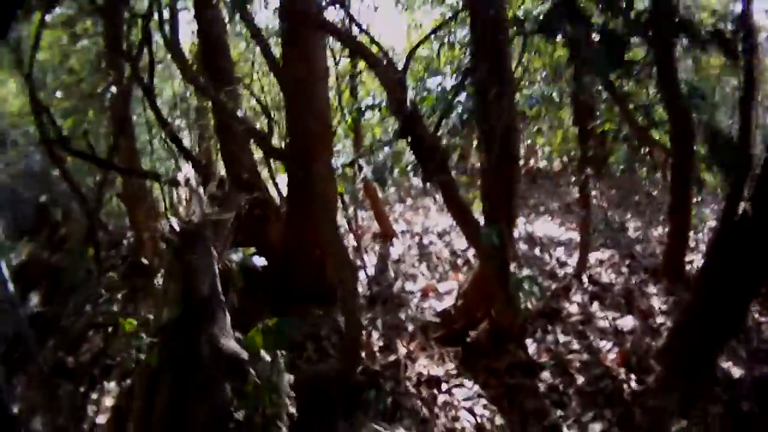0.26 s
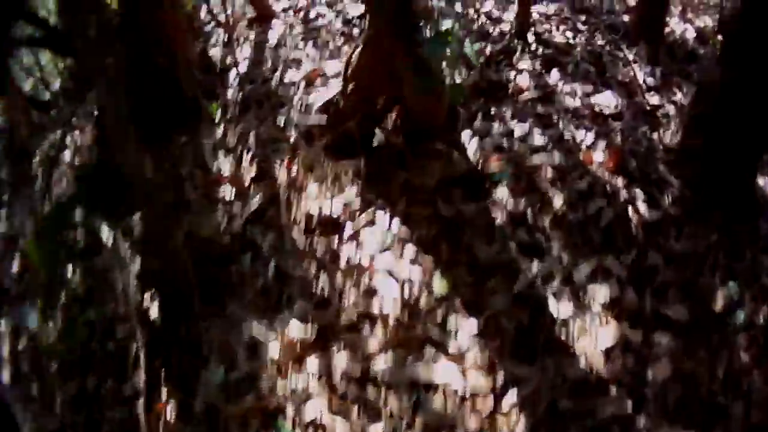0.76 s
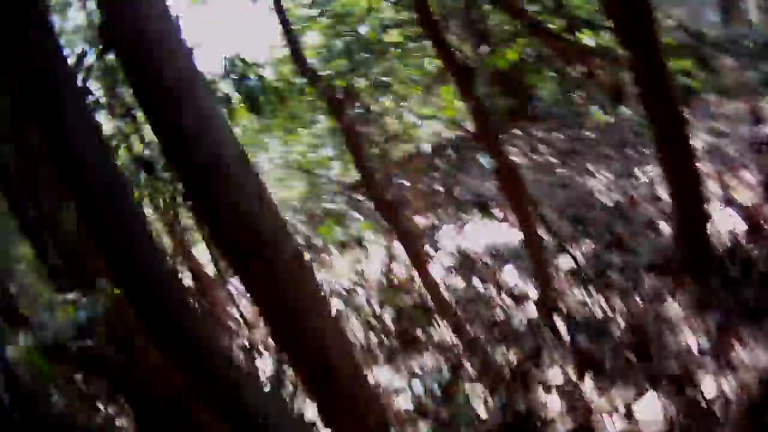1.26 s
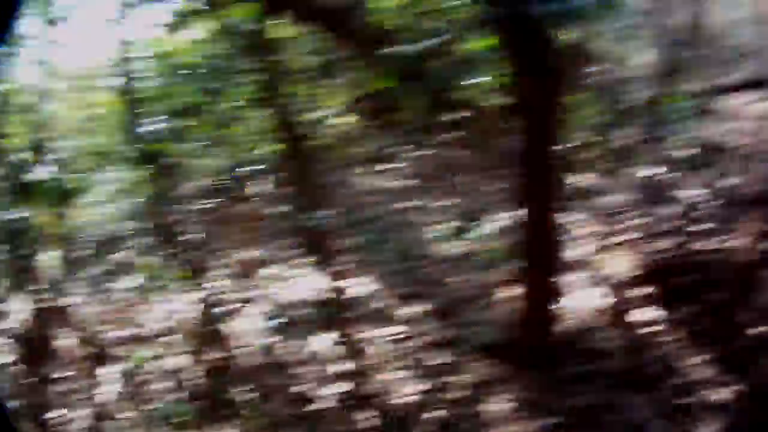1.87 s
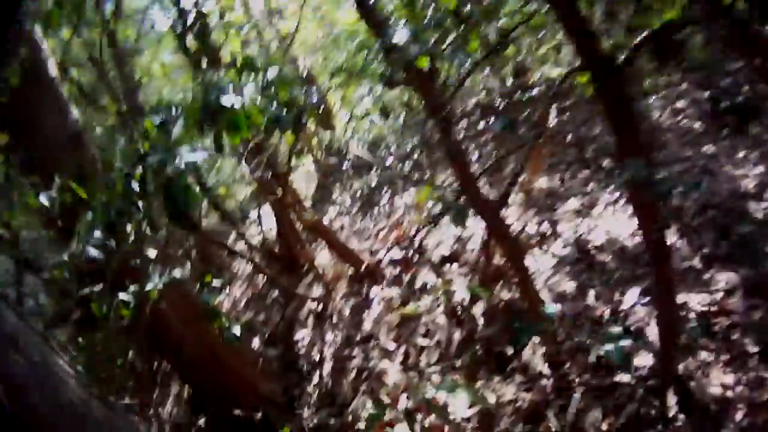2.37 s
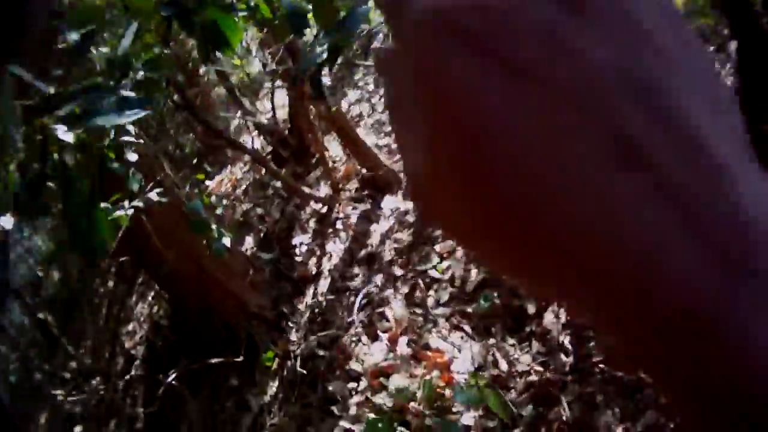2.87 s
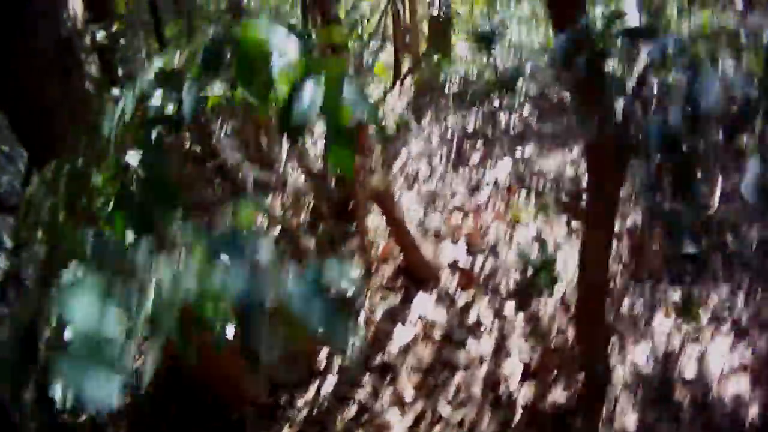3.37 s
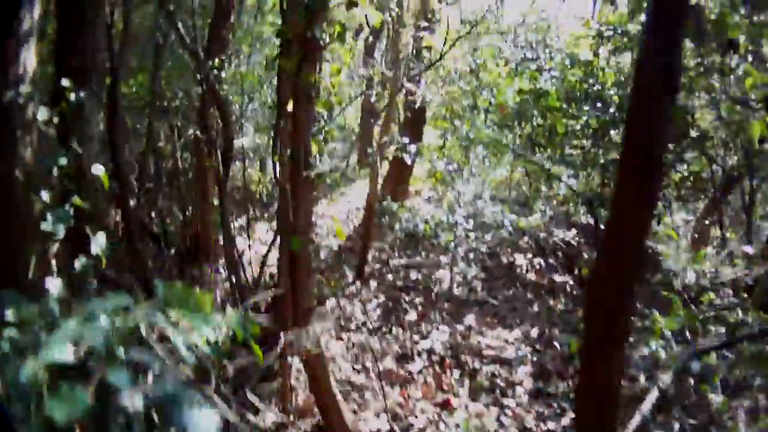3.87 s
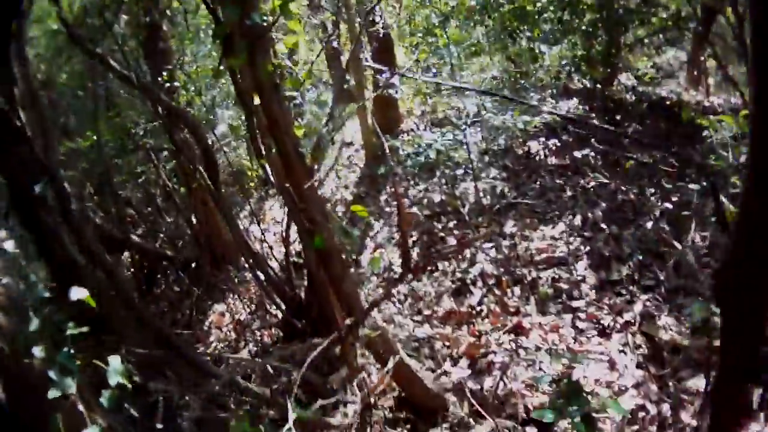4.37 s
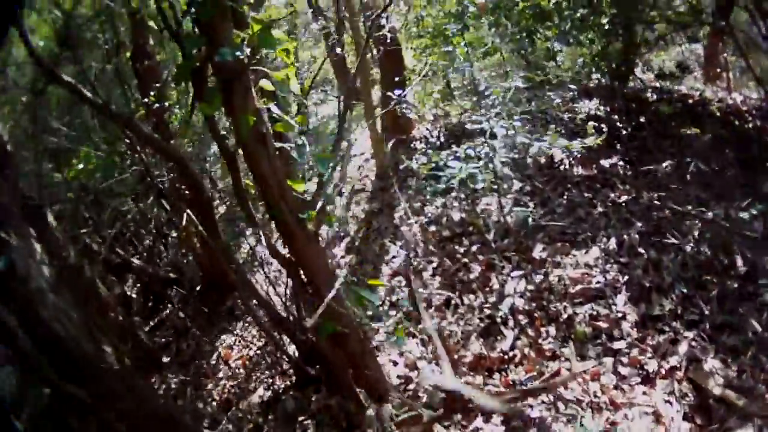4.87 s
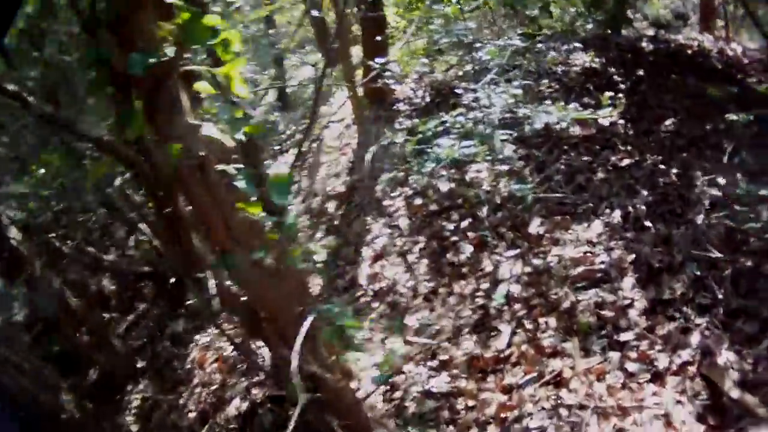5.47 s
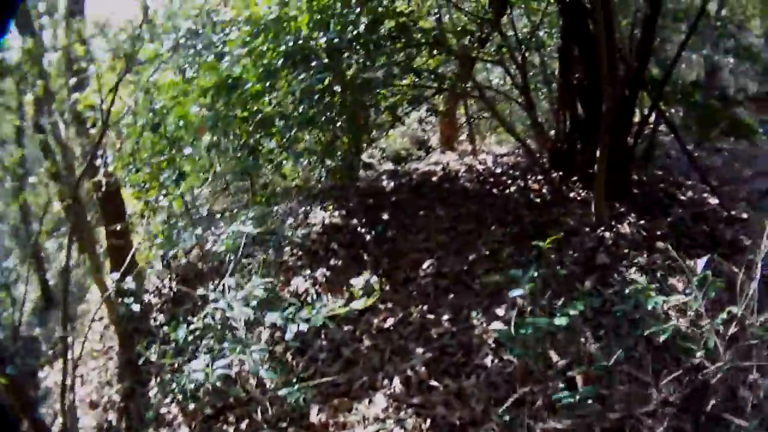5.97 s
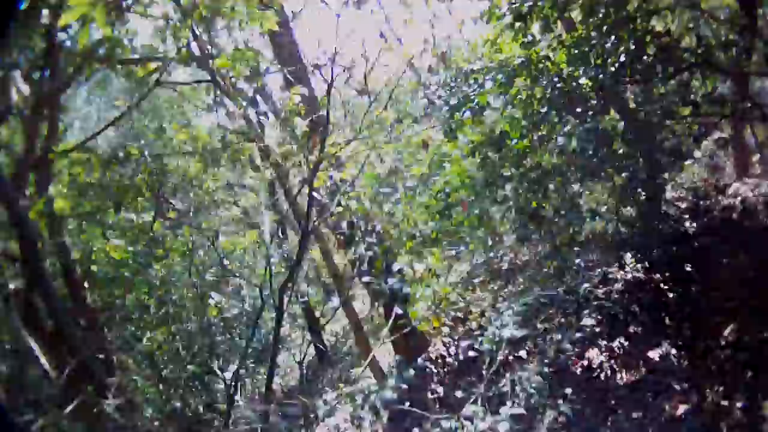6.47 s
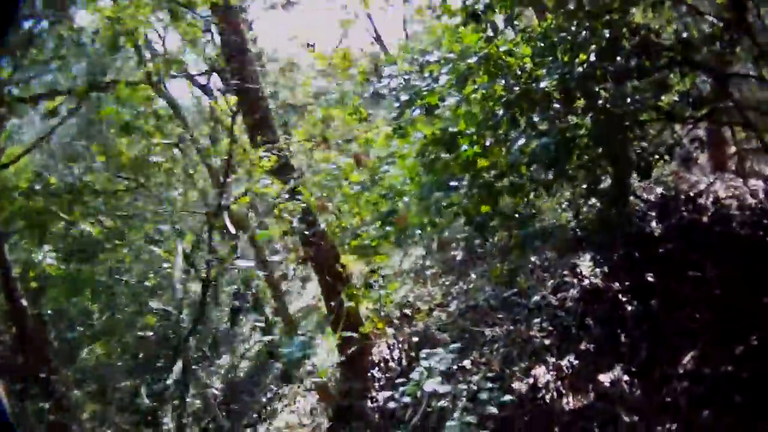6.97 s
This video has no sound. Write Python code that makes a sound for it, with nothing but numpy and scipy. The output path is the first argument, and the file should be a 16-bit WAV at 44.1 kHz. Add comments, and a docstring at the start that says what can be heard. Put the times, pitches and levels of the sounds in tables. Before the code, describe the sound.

Close, irregular footsteps crush dry leaves on a forest floor, with ticking twigs and soft knocks from buried sticks. A pushed branch hits the handheld microphone with a sharp knock and a quick rasp. The walker brushes on through the litter, and two twigs break loudly about two seconds apart. Loose leaves keep stirring between the steps, over a very faint hiss of woodland air.

```python
"""Walking through dry leaves

Someone walks unevenly through fallen leaves in a quiet wood, camera in hand. Each step crushes
them into a dense crackle; twigs snap, buried sticks knock, heavy feet thud and the trunks scatter
the sound. A branch that is pushed aside knocks on the camera and scrapes along it."""
import sys
import numpy as np
from scipy import signal
from scipy.fft import rfft, irfft
from scipy.io import wavfile
from scipy.ndimage import uniform_filter1d, minimum_filter1d

SR = 44100
rng = np.random.default_rng(int(sys.argv[2]) if len(sys.argv) > 2 else 0)


def generate_wav(sig):
    """Save sig (samples, or channels by samples) to the path in sys.argv[1] as 16-bit PCM at SR."""
    pcm = np.round(np.clip(np.atleast_2d(sig).T, -1, 1) * 32767).astype(np.int16)
    wavfile.write(sys.argv[1], SR, pcm)


N = 318679
TIME = np.arange(N) / SR
FREQ = np.fft.rfftfreq(N, 1 / SR) + 1


def undb(db):
    """Decibels to gain."""
    return 10 ** (np.asarray(db) / 20)


def unit(x):
    """Scale to rms 1."""
    return x / np.sqrt(np.mean(x ** 2))


def colour(x, points):
    """EQ through (Hz, dB) points; minimum phase, so clicks keep their sharp attacks."""
    hz, db = np.transpose(points)
    grid = np.fft.rfftfreq(2048, 1 / SR) + 1
    gain = undb(np.interp(np.log(grid), np.log(hz), db))
    cepstrum = irfft(np.log(gain))
    half = len(cepstrum) // 2
    cepstrum[1:half] *= 2
    cepstrum[half + 1:] = 0
    impulse = irfft(np.exp(rfft(cepstrum)))
    return signal.fftconvolve(x, impulse)[:len(x)]


def band(x, hz, q):
    """One resonance, gain 1 at its centre."""
    w = 2 * np.pi * min(hz, .45 * SR) / SR
    a = np.sin(w) / (2 * q)
    return signal.lfilter([a, 0, -a], [1 + a, -2 * np.cos(w), 1 - a], x)


def burst(t60):
    """A noise hit with an instant attack, a fading tail and an evened-out spectrum."""
    fade = np.exp(-np.log(1000) * TIME[:SR // 4] / t60)
    spectrum = rfft(rng.standard_normal(len(fade)) * fade)
    even = irfft(spectrum / np.abs(spectrum) ** .7, len(fade))
    return even * np.sqrt(fade * np.sum(fade ** 2) / np.sum(even ** 2))


def drift(per_s):
    """A random modulator that glides between values with a spread of 1."""
    points = rng.standard_normal(4096)
    return np.interp(TIME * per_s, np.arange(len(points)), points)


def add(out, s, x):
    """Mix a short sound in at s seconds."""
    i = max(int(s * SR), 0)
    out[i:i + len(x)] += x[:max(N - i, 0)]


# The tone of the quiet wood. Each row: frequency in Hz, gain in dB.
AIR_EQ = [(30, -8), (100, -13), (250, -7.5), (420, -1.5), (750, -15.5), (1300, -5.5), (3000, -4.5),
          (8000, -10), (15000, -13.5)]


def air():
    """A faint bed of noise whose level wavers."""
    return undb(-54.5 + 3.85 * drift(7.8)) * unit(colour(rng.standard_normal(N), AIR_EQ))


# Loose leaves stirring between steps. Each row: time in seconds, relative level in dB.
STIR_LEVELS = [(0, -60.5), (.38, -52), (.88, -56), (1.45, -51.5), (1.95, -55), (2.45, -48.5), (2.78, -52),
               (2.93, -59), (3.2, -48), (5.4, -47), (6.6, -46.5), (7.23, -48)]


def stirring():
    """A restless rustle that comes and goes: one move of (envelope, body dB, crispness dB)."""
    level_db = np.interp(TIME, *np.transpose(STIR_LEVELS))
    return [(undb(level_db + 1.29 * drift(14)), 3, 1)]


def fractures(per_s, spread_db, t60, q, bands):
    """Leaves of many pitches break at random, each with a tick of noise; most are tiny, a few large."""
    out = 0
    fade = np.exp(-2 * np.log(1000) / (t60 * SR))
    for hz in np.geomspace(500, 14000, bands):
        breaks = np.flatnonzero(rng.random(N) < per_s / bands / SR)
        energy = np.zeros(N)
        energy[breaks] = undb(spread_db * np.minimum(rng.exponential(size=len(breaks)), 3.5)) ** 2
        ticks = np.sqrt(signal.lfilter([1], [1, -fade], energy + 1e-12))
        out = out + ticks * band(rng.standard_normal(N), hz, q)
    return unit(out / np.sqrt(per_s))


# The tone of crushed leaves. Each row: frequency in Hz, gain in dB.
LEAF_EQ = [(47, -50), (80, -14), (205, -12.5), (482, -5.5), (684, -14), (1320, -5.5), (1640, -3.5),
           (2550, 2), (4210, -2), (4700, 1), (5850, -2.5), (7440, -0.5), (8870, -2.5), (13200, -4),
           (15000, -9.5)]


def leaves(moves):
    """A harder push breaks more leaves; loose ones crackle on top, single stalks tick between steps."""
    envelopes, body_db, crisp_db = map(np.array, zip(*moves))
    power = envelopes ** 2
    push = np.sqrt(np.sqrt(power.sum(axis=0)) / undb(-40.5))
    crush = fractures(5500 * push, spread_db=1.5, t60=0.0053, q=0.19, bands=4)
    crackle = fractures(650 * push, spread_db=4.5, t60=0.014, q=3.2, bands=18)
    stalks = fractures(30, spread_db=3.0, t60=0.013, q=1.8, bands=8) / np.maximum(push, 1)
    crunch = crush * undb(1.62 * drift(70)) + undb(-4.5) * crackle + undb(-8.5) * stalks
    spectrum = rfft(unit(colour(crunch, LEAF_EQ)))
    # The moves ride three faders: the body of the packed litter, the mids and the crisp top.
    low = 1 / (1 + (FREQ / 1200) ** 4)
    high = 1 / (1 + (5500 / FREQ) ** 4)
    registers = [(low, 3.2 + body_db), (1 - low - high, 0.13 - crisp_db / 2), (high, 2.5 + crisp_db / 2)]
    out = np.zeros(N)
    for share, db in registers:
        fader = np.sqrt(undb(db) ** 2 @ power)
        out += irfft(spectrum * share, N) * fader
    return out


def trunks(x, t60, scatter_db):
    """Ground and trunks add a short, thin scatter to the direct sound."""
    onset = 1 - np.exp(-TIME[:SR // 4] / 0.00037)
    echo = band(burst(t60) * onset, 3900, q=0.057)
    return x + undb(scatter_db) * signal.fftconvolve(x, echo / np.linalg.norm(echo))[:N]


# Twigs and stalks breaking; the row at 1.153 s is the sharp crack of a heel landing. Each row: start in
# seconds, # level in dB, centre in Hz, time scale of the decay in seconds.
TWIG_SNAPS = [(.066, -41.5, 7100, .007), (.355, -36.5, 7000, 0.0092), (.597, -29.5, 3980, 0.021),
              (.629, -30, 6800, 0.027), (.730, -31.5, 5700, 0.025), (.9276, -17.5, 6040, 0.0094),
              (.929, -33.5, 1410, 0.01), (.976, -26, 2740, 0.008), (1.007, -27, 6700, 0.011),
              (1.095, -33, 5000, .013), (1.153, -41, 8000, 0.023), (1.3741, -28, 4230, 0.016),
              (1.663, -38, 7000, 0.0096), (1.752, -47, 1190, 0.029), (1.858, -35.5, 6030, .008),
              (1.996, -40, 1480, 0.041), (2.130, -32, 5030, 0.011), (2.3278, -31.5, 1680, 0.026),
              (2.328, -32, 10500, 0.0083), (2.454, -37.5, 2800, 0.021), (2.5543, -25, 5500, 0.002),
              (3.633, -29, 8760, 0.008), (3.743, -27.5, 8870, 0.017), (3.8318, -7, 11200, 0.0099),
              (3.853, -18.5, 8000, 0.029), (3.883, -20.5, 10260, 0.0079), (3.9882, -21.5, 7640, .006),
              (4.044, -27.5, 7160, 0.015), (4.1505, -29, 10100, .006), (4.296, -32, 4505, 0.0072),
              (4.452, -40, 1180, 0.032), (4.549, -25, 4950, .023), (4.6823, -21, 1377, 0.017),
              (4.712, -29, 12140, 0.0098), (4.806, -31.5, 3530, .034), (5.276, -35, 4000, .007),
              (5.288, -24, 4690, 0.019), (5.528, -24.5, 4800, 0.0095), (5.633, -4.5, 4120, 0.014),
              (5.6332, -8.5, 9350, 0.0075), (5.906, -19, 6430, 0.0056), (5.922, -27.5, 6200, 0.0093),
              (6.33, -32, 6100, .01), (6.364, -26, 4500, 0.0061), (6.407, -25.5, 1380, 0.0062),
              (6.655, -33, 3850, 0.0086), (6.847, -33.5, 4700, 0.016), (6.9285, -32.5, 8200, 0.0071),
              (7.2044, -32, 3870, 0.021)]


def twigs():
    """Fibres tear and part; the twig rings broadly, with a narrow ping and two stray modes."""
    out, t = np.zeros(N), TIME[:SR // 4]
    for s, db, hz, decay_s in TWIG_SNAPS:
        tear = burst(2.0 * decay_s) * (np.exp(-(t / (0.36 * decay_s)) ** 2) + 0.21)
        ping = 1.22 * band(tear, hz, q=9)
        strays = 0.95 * sum(band(tear, hz * 2 ** octave, q=3.9) for octave in rng.uniform(-1.21, 0.88, 2))
        ring = band(tear, hz, q=1.0) + 1.05 * (ping + strays)
        crack = band(ring, hz, q=0.041) + 0.21 * band(tear, 8300, q=1.0)
        add(out, s, undb(db) * crack / np.std(crack[:SR // 500]))
    return out


# Sweeps through the leaves. Each row: peak time in seconds, relative level in dB,
# half-width in seconds, crispness in dB.
LIMB_SWEEPS = [(0.181, -50.5, 0.022, 6), (.28, -51.5, 0.022, 2), (0.606, -44.5, 0.041, -4),
               (0.775, -45, 0.068, -0.5), (1.03, -45.5, .025, -1), (1.104, -45, .015, 4),
               (2.574, -45.5, 0.063, -3), (2.716, -39.5, .04, 1), (3.056, -31.5, 0.037, 1.5),
               (3.207, -33.5, 0.046, 2.5), (3.326, -34, 0.028, 4.5), (3.517, -37.5, 0.18, 0),
               (4.196, -43, 0.079, -5), (4.879, -43.5, 0.084, 0), (5.074, -42, 0.023, 3.5),
               (5.226, -39, 0.066, -5), (5.778, -44, 0.043, 3), (6.025, -40.5, 0.027, 4),
               (6.096, -39, 0.037, -2.5), (6.685, -46, 0.047, 0)]


def swishes(body_db=-5):
    """Moves that swell and fade as a leg or arm brushes the leaves, hardly reaching the packed litter."""
    moves = []
    for s, db, half_s, crisp_db in LIMB_SWEEPS:
        swell = np.exp(-np.minimum(((TIME - s) / half_s) ** 2, 100) / 2)
        moves.append((undb(db) * swell, body_db, crisp_db))
    return moves


# Heel or toe pressing into the leaves. Each row: start in seconds, relative level in dB, attack and
# hold in seconds, body of the packed litter in dB, crispness of the top leaves in dB.
FOOT_PRESSES = [(0.427, -35.5, .04, 0.038, -5, -1), (0.914, -39, 0.014, .015, 3.5, -4),
                (1.147, -34, 0.0069, 0.011, 1, -2), (1.165, -24.5, .025, .006, -7, 0.5),
                (1.217, -31, 0.016, .012, -2, -1), (1.721, -58, .02, 0.092, 15.5, 0),
                (1.988, -35, 0.05, 0.095, -4.5, 0), (3.77, -30.5, 0.061, 0.043, -1.5, 3.5),
                (3.946, -36, 0.019, 0.049, 3.5, 0.5), (4.449, -44.5, 0.021, 0.0199, 11, -2),
                (4.505, -33.5, 0.033, 0.0046, -11, -2), (4.576, -28, .05, .05, -1, 1.5),
                (5.439, -30.5, 0.043, 0.03, 2.5, 0), (5.592, -35.5, 0.025, 0.018, 2.5, 4),
                (6.191, -29.5, .15, .02, 2, -1)]


def steps(release_db_per_s=115):
    """Moves that build as a foot presses down, hold, and die away as the weight comes to rest."""
    moves = []
    for s, db, attack_s, hold_s, body_db, crisp_db in FOOT_PRESSES:
        press = np.clip((TIME - s) / attack_s, 0, 1)
        resting_s = np.maximum(TIME - s - attack_s - hold_s, 0)
        moves.append((press * undb(db - release_db_per_s * resting_s), body_db, crisp_db))
    return moves


# Heavy footfalls and jolts. Each row: peak time in seconds, level in dB, half-width in seconds.
LOW_BUMPS = [(0.469, -51, 0.027), (0.556, -54, 0.045), (1.18, -53, 0.035), (1.247, -48.5, 0.046),
             (2.188, -66, 0.037), (2.835, -51, 0.018), (3.833, -58, 0.016), (4.173, -55, 0.016),
             (6.367, -66, 0.022)]


def thuds():
    """A heavy foot or a jolt reaches the microphone as a dull low bump."""
    weight = sum(undb(db) * np.exp(-((TIME - s) / half_s) ** 2 / 2) for s, db, half_s in LOW_BUMPS)
    rumble = band(band(rng.standard_normal(N), 63, q=0.38), 66, q=0.24)
    return weight * unit(rumble)


# Thick sticks buried in the litter. Each row: start in seconds, relative level in dB, pitch in Hz.
BURIED_STICKS = [(.603, -40.5, 424), (.931, -37, 476), (1.243, -35, 473), (1.482, -51, 256),
                 (2.155, -44.5, 466), (2.258, -46.5, 430), (2.555, -44, 427), (4.476, -42, 385),
                 (4.633, -46, 251.5), (4.682, -39, 462), (5.293, -48, 225), (5.637, -30.5, 350),
                 (5.783, -43, 428), (6.336, -37, 326), (6.407, -35.5, 427)]


def sticks():
    """Damp wood on soft ground knocks dully underfoot: three bending modes that die quickly."""
    out, t = np.zeros(N), TIME[:SR // 4]
    attack = 1 - np.exp(-t / 0.00082)
    for s, db, hz in BURIED_STICKS:
        for ratio, gain in [(1, 0.94), (1.4, 0.42), (2.7, 0.64)]:
            decay = np.exp(-np.log(1000) * t * np.sqrt(ratio) / 0.033)
            mode = gain * np.sin(2 * np.pi * hz * ratio * t)
            add(out, s, 2 * undb(db) * mode * attack * decay)
    return out


# The ring of the camera body. Each row: frequency in Hz, level in dB, full 60 dB decay time in seconds.
CAMERA_MODES = [(260, -17.5, 0.069), (333.5, -9, 0.037), (450, -14, 0.074), (627, -17.5, 0.04),
                (813, -15, 0.029), (972, -9, 0.026), (1177, -4.5, 0.029), (1454, -9, 0.021),
                (2240, -3, 0.016), (3155, -2, 0.022), (4830, 3, 0.0099), (6514, 5, 0.0067)]
# The branch hitting the camera. Each row: start in seconds, level in dB, contact time in seconds,
# share of the full decay time.
BRANCH_HITS = [(2.8172, -12.5, .00005, 1), (2.838, -22, 0.0036, 0.38), (2.8504, -24, 0.003, 0.29),
               (2.8636, -39, 0.0068, 0.54), (2.886, -36, 0.0086, 0.77), (4.172, -20.5, 0.00057, 1),
               (4.729, -40, .0008, 0.37), (5.291, -38.5, 0.0028, 0.5)]


def knocks():
    """A brief chattering contact rings the camera body; a soft blow reaches only the low modes."""
    out, t = np.zeros(N), TIME[:SR // 4]
    attack = 1 - np.exp(-t / 0.00013)
    for s, db, contact_s, ring_share in BRANCH_HITS:
        knock = 2.5 * band(burst(0.026), 4900, q=0.21) / (1 + (3000 * contact_s) ** 2)  # the chatter
        for hz, mode_db, t60 in CAMERA_MODES:
            detuned_hz = hz * (1 + 0.019 * rng.standard_normal())
            mode = np.sin(2 * np.pi * (detuned_hz * t + rng.random()))
            decay = np.exp(-np.log(1000) * t / (t60 * ring_share))
            knock += undb(mode_db) * mode * decay / (1 + (hz * contact_s) ** 2)
        knock = band(knock * attack, 1140, q=0.41)
        add(out, s, undb(db) * knock / np.std(knock[:SR // 200]))
    return out


# The tone of bark on the camera. Each row: frequency in Hz, gain in dB.
BARK_EQ = [(150, -19), (280, -7), (700, -19), (1050, -22), (1550, 6.5), (1850, -2), (2200, 5), (3000, 4),
           (4500, 7), (5600, 7), (7500, 4), (10000, -6), (15000, 0)]
# The branch slipping along the camera. Each row: peak time in seconds, relative level in dB,
# half-width in seconds, low-pass cutoff in Hz.
BRANCH_SLIPS = [(2.839, -11, 0.0027, 10500), (2.8508, -14.5, 0.0024, 13800), (2.863, -13.5, 0.0015, 8000),
                (2.867, -16, 0.00068, 7000), (2.8854, -12, 0.0017, 9300)]


def scrapes():
    """Bark catches and slips in quick rasps, duller as the branch slows."""
    out, t = np.zeros(N), TIME[:SR // 10]
    middle = t.mean()
    for s, db, half_s, cutoff_hz in BRANCH_SLIPS:
        lowpass = signal.butter(4, cutoff_hz, fs=SR, output="sos")
        rasp = unit(signal.sosfilt(lowpass, colour(rng.standard_normal(len(t)), BARK_EQ)))
        from_peak = (t - middle) / half_s
        slip = np.exp(-from_peak ** 2 / 2) + 0.23 * np.exp(-np.abs(from_peak) / 2.6)
        add(out, s - middle, undb(db - 3.5) * slip * rasp)
    return out


def scene():
    """The mono mix: the quiet wood behind, leaves and wood underfoot, the branch at the camera."""
    bed = air()
    rustle = trunks(leaves(stirring() + swishes() + steps()), t60=0.072, scatter_db=-13.5)
    wood = trunks(twigs() + sticks(), t60=0.15, scatter_db=-11.0)
    ground = rustle + wood + thuds()
    branch = trunks(knocks(), t60=0.31, scatter_db=-12) + scrapes()
    return (bed + ground + branch)[None]


# Peaks and dips of the microphone port. Each row: centre in Hz, half-width in Hz, gain in dB.
PORT_EQ = [(780, 350, 1), (1340, 180, 1.5), (3380, 380, -2), (4310, 100, 2.5), (4720, 280, -4),
           (5860, 250, 2), (7590, 440, -5)]


def record(dry):
    """The microphone port colours the sound, a fast limiter holds the loudest cracks, the top is cut."""
    ceiling, top_hz = .72, 15400
    port_db = sum(db * np.exp(-((FREQ - hz) / half_hz) ** 2) for hz, half_hz, db in PORT_EQ)
    heard = irfft(rfft(dry) * undb(port_db), N)
    gain = ceiling / np.maximum(np.abs(heard), ceiling)
    gain = uniform_filter1d(minimum_filter1d(gain, size=25), size=25)
    lowpass = signal.ellip(8, .2, 70, top_hz, fs=SR, output="sos")
    return signal.sosfilt(lowpass, heard * gain)


dry = scene()
out = record(dry)
generate_wav(out)
```